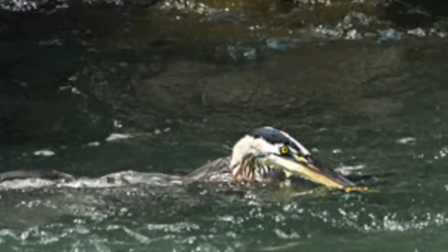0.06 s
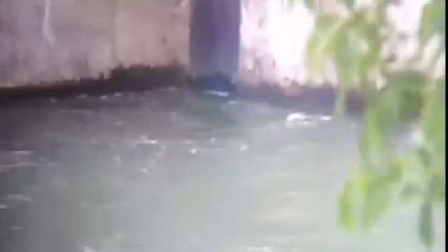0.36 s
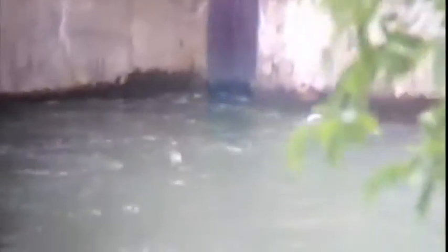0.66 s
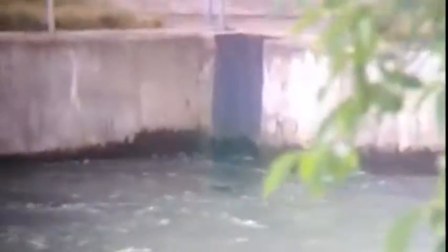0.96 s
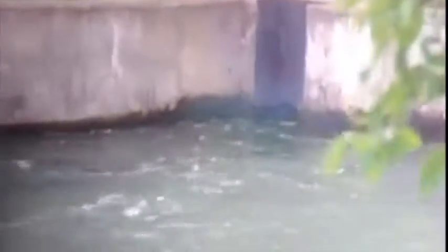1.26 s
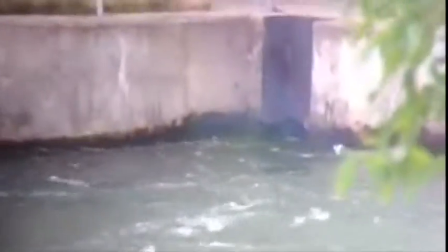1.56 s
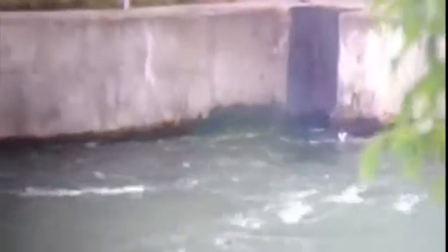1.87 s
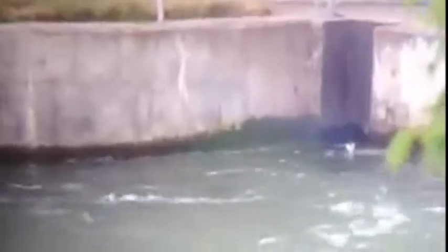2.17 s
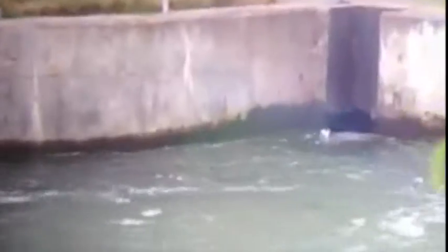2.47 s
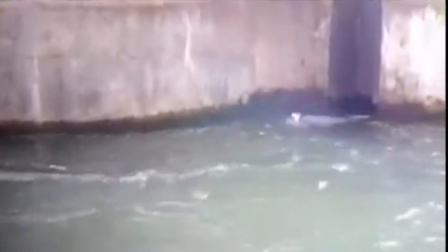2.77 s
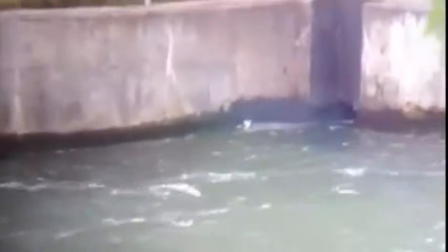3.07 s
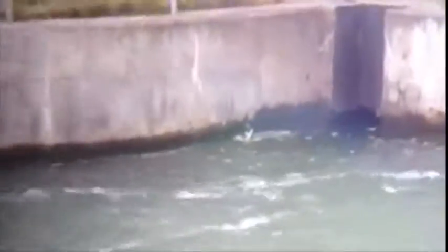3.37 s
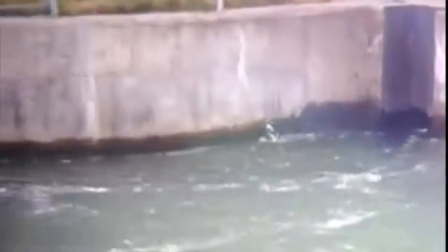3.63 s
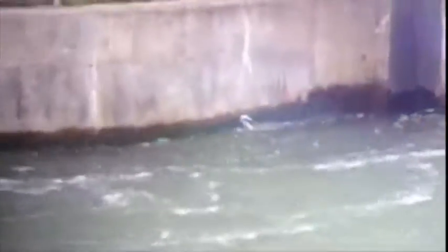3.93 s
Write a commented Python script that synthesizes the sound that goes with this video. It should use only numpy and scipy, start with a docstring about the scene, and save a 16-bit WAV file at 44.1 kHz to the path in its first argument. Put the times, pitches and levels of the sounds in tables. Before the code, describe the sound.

A dense rush of bubbling water cuts in and keeps roaring beside a concrete canal lock wall. A deep rumble swells underneath, with occasional gulps of air and a thin spray hiss, all slightly muffled from the bank.

```python
"""A dense rush of bubbling water cuts in after a short silence.
It is water churning through the sluices (gates) of a canal lock, heard from the bank through a
dull microphone. Small bubbles ring and echo off the lock wall, over a low, surging rumble from
the culvert, the tunnel that carries the water. Larger air pockets gulp now and then.
A few faint, wavering tones ring in the roar, and spray adds a thin hiss."""
import sys
import numpy as np
from scipy import signal
from scipy.fft import rfft, irfft
from scipy.io import wavfile
from scipy.ndimage import uniform_filter1d

SR = 44100
rng = np.random.default_rng(int(sys.argv[2]) if len(sys.argv) > 2 else 0)


def store_wav(level_fs):
    """Save 16-bit WAV to argv[1]."""
    pcm = np.round(np.clip(np.atleast_2d(level_fs), -1, 1) * 32767)
    wavfile.write(sys.argv[1], SR, pcm.T.astype(np.int16))


N = 176400
TIME = np.arange(N) / SR

# How strong the rushing water is from low to high. Columns: pitch_hz, relative_db
RUSH_SPECTRUM = [(100, -7.5), (170, 5), (300, 5), (400, 5.5), (520, 1.5), (650, -2), (850, 1.5), (1100, 0),
                 (1300, -1.5), (1650, -1.5), (1950, 0), (2180, 3), (2380, -1.5), (2520, -7), (2700, -12),
                 (3000, -18.5), (3500, -26), (4200, -39.5), (6000, -58)]
# The same for the rumble in the culvert. Columns: pitch_hz, relative_db
RUMBLE_SPECTRUM = [(15, -42.5), (28, -24.5), (40, -11.5), (52, -1.5), (64, 3.5), (90, 0), (122, -1.5),
                   (165, -5.5), (230, -24), (500, -55.5), (1500, -100)]
# How the rumble swells and sinks. Columns: time_s, relative_db
RUMBLE_SURGES = [(.25, -40), (.5, -37), (.95, -39), (1.04, -39), (1.16, -38), (1.3, -41), (1.42, -37),
                 (1.65, -36.5), (1.85, -40.5), (1.95, -45.5), (2.15, -45.5), (2.22, -37.5), (2.45, -40),
                 (2.78, -38.5), (2.95, -40.5), (3.14, -37.5), (3.52, -39.5), (3.66, -46.5), (3.79, -34.5),
                 (3.92, -43.5)]
# One large air pocket a row. Columns: peak_time_s, pitch_hz, peak_db, length_s
AIR_POCKETS = [(.73, 236, -38, 0.096), (1.14, 70, -33.5, .1), (1.241, 428, -36, .07),
               (1.634, 120.1, -31, 0.0508), (2.048, 850, -27.5, 0.0079), (2.074, 228, -35.5, 0.027),
               (2.265, 230, -36, .07), (2.965, 232, -34.5, 0.0797), (3.168, 115, -28.5, 0.032),
               (3.681, 236, -39, 0.095), (3.791, 88, -31, .08)]
# Faint tones in the roar. Columns: pitch_hz, waver_hz, peak_db, peak_time_s, fade_db_per_s
RINGING_TONES = [(232, 11, -50.5, 2.9, .5), (396, 30, -51.5, .6, 1), (722, 5, -59.5, 1, 1.5),
                 (769.3, 8.1, -46.5, .5, 2), (792, 7, -52, .6, 3), (1141, 13, -52, 1.2, 1.5),
                 (1225, 3, -49, 3.0, 6), (1366, 5.7, -54.5, 3.4, 1), (1406, 10.4, -51.5, 1.2, 2.2)]
# How strong the spray is across the treble. Columns: pitch_hz, relative_db
SPRAY_SPECTRUM = [(4000, 0), (5400, -2), (5900, -5.5), (6500, -5.5), (7000, -2.5), (7600, -7), (9000, -10),
                  (11000, -10.5), (12400, -9), (13000, -7), (13700, -10.5), (15200, -11.5)]


def water_rush(level_db=-37):
    """Broken water makes a dense, boiling noise that swells slightly."""
    boiling = churn(patch_db=1.0, patch_s=0.038, patch_hz=500, flicker_db=0.42)
    return gain(level_db + 0.36 * drift(rate_hz=3.6)) * colour(boiling, RUSH_SPECTRUM)


def culvert_rumble():
    """Water tumbling in the culvert makes a deep noise that comes in surges."""
    level_db = np.interp(TIME, *np.transpose(RUMBLE_SURGES)) + 0.73
    return gain(level_db) * colour(rng.standard_normal(N), RUMBLE_SPECTRUM)


def small_bubbles(level_db=-44, per_second=900, sizes=36, decay_cycles=4, rise=.06):
    """Each small bubble rings briefly and rises in pitch; the lock wall sends back an echo."""
    t, out = np.arange(4096) / SR, np.zeros(N)
    for hz in np.geomspace(220, 2350, sizes):
        age = t * hz / decay_cycles  # higher bubbles die away sooner
        pitch_hz = hz * (1 + rise * np.minimum(age, 2))
        fade = (1 - np.exp(-4 * age)) * np.exp(-age)
        ring = fade * np.sin(2 * np.pi * np.cumsum(pitch_hz) / SR)
        births = rng.random(N) < per_second / sizes / SR
        strength = gain(3.5 * np.minimum(rng.exponential(1, N), 3.5))  # a few stand out
        kicks = births * strength * rng.choice([-1, 1], N)
        out += signal.oaconvolve(kicks, normalise(ring) * np.sqrt(hz))[:N]  # one ring per kick
    echo_s, echo_db = .043, -6
    out += gain(echo_db) * np.interp(TIME - echo_s, TIME, out)
    return gain(level_db) * colour(out, RUSH_SPECTRUM)


def air_gulps(rise=.05):
    """Each large air pocket gives a gulp that swells and dies away, rising a little in pitch."""
    out = np.zeros(N)
    for peak_time_s, pitch_hz, peak_db, length_s in AIR_POCKETS:
        from_peak = np.clip((TIME - peak_time_s) / length_s, -4, 4)
        cycles = np.cumsum(pitch_hz * (1 + rise * from_peak)) / SR + rng.random()
        swell = np.exp(-(2 * from_peak) ** 2)
        out += gain(peak_db) * swell * np.sin(2 * np.pi * cycles)
    return out


def faint_tones(waver=.75):
    """Tones waver in strength and pitch; each grows once, then fades."""
    out = np.zeros(N)
    for pitch_hz, waver_hz, peak_db, peak_time_s, fade_db_per_s in RINGING_TONES:
        sway = (1 - waver) + waver * (drift(waver_hz) + 1j * drift(waver_hz))
        tone = normalise((sway * np.exp(2j * np.pi * pitch_hz * TIME)).real)
        out += gain(peak_db - fade_db_per_s * abs(TIME - peak_time_s)) * tone
    return out


def spray_hiss(level_db=-66.5):
    """Spray makes a thin, smooth hiss, much quieter than the rush."""
    spray = churn(patch_db=0.3, patch_s=.12, patch_hz=1500, flicker_db=0.8)
    return gain(level_db) * colour(spray, SPRAY_SPECTRUM)


def churn(patch_db, patch_s, patch_hz, flicker_db, size=512):
    """Noise that gets louder and softer in small patches of time and pitch."""
    hop = size // 4
    shape = (N // hop + 6, size // 2 + 1)  # a grid of moments by pitches
    real, imaginary, field = rng.standard_normal((3,) + shape)
    along = np.fft.fftfreq(shape[0], hop / SR)[:, None]
    across = np.fft.fftfreq(shape[1], SR / size)
    blur = np.exp(-(along * patch_s) ** 2 - (across * patch_hz) ** 2)
    patches = normalise(np.fft.ifft2(np.fft.fft2(field) * blur).real)
    flicker = normalise(uniform_filter1d(rng.standard_normal(shape[0]), size=4))[:, None]
    grid = (real + 1j * imaginary) * gain(patch_db * patches + flicker_db * flicker)
    return signal.istft(grid.T, nperseg=size, noverlap=size - hop)[1][:N]


def colour(sound, spectrum):
    """Shapes the lows and highs of a sound by a table, then sets its strength to one."""
    pitch_hz, relative_db = np.transpose(spectrum)
    hz = np.fft.rfftfreq(N, 1 / SR)
    curve_db = np.interp(np.log(hz + 1), np.log(pitch_hz), relative_db)
    return normalise(irfft(rfft(sound) * gain(curve_db), N))


def drift(rate_hz):
    """Slow random wandering, up to about the given rate."""
    hz = np.fft.rfftfreq(N, 1 / SR)
    keep_slow = np.exp(-(hz / rate_hz) ** 2) * (hz > 0)
    return normalise(irfft(rfft(rng.standard_normal(N)) * keep_slow, N))


def gain(db):
    """Turns decibels into a number to multiply by."""
    return 10 ** (np.asarray(db) / 20)


def normalise(x):
    """Sets the average strength (rms) to one."""
    return x / np.sqrt(np.mean(x ** 2) + 1e-20)


def scene():
    """All the water sounds together, in one channel."""
    water = water_rush() + culvert_rumble() + small_bubbles() + air_gulps()
    return (water + faint_tones() + spray_hiss())[None]


def record(dry, start_s=0.2276, fade_in_s=0.0094, cutoff_hz=15300):
    """The sound cuts in after a short silence, with its highest treble removed."""
    fade_in = np.clip((TIME - start_s) / fade_in_s, 0, 1) ** 2
    treble_cut = signal.firwin(1023, cutoff_hz, window=("kaiser", 9), fs=SR)
    return signal.oaconvolve(dry * fade_in, treble_cut[None], "same")


dry = scene()
out = record(dry)
store_wav(out)
```